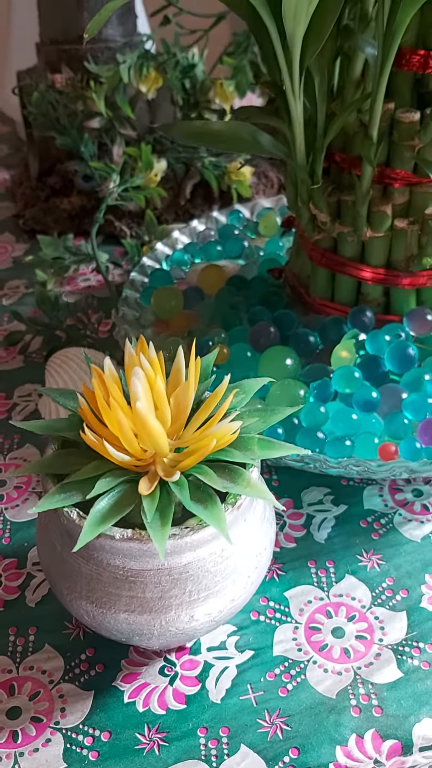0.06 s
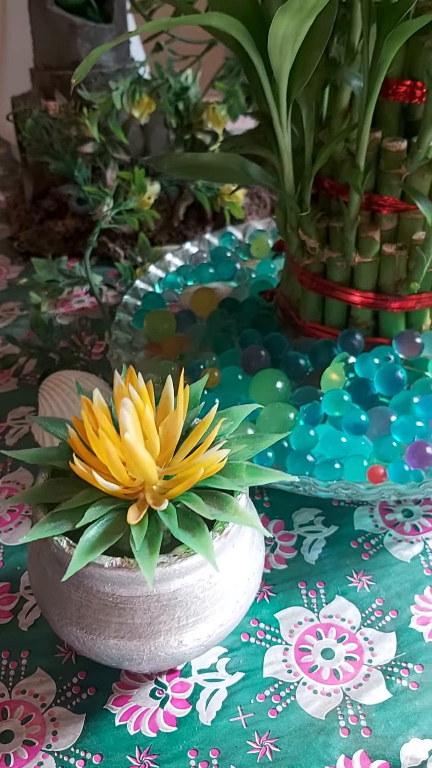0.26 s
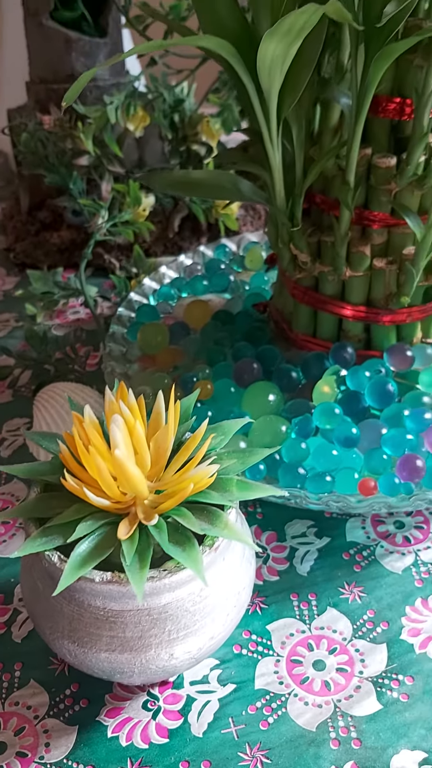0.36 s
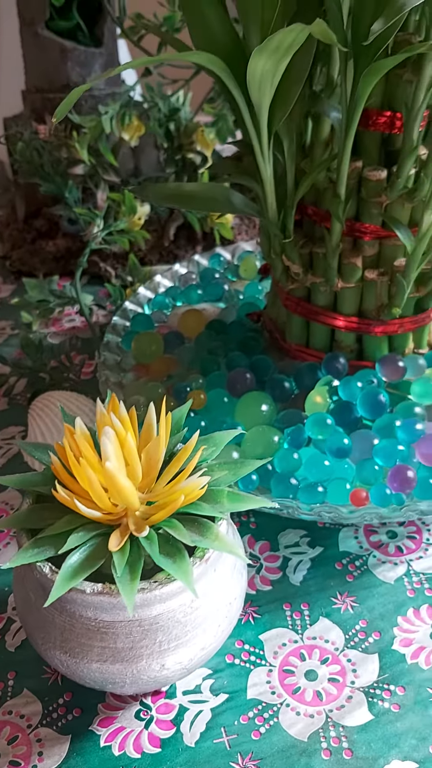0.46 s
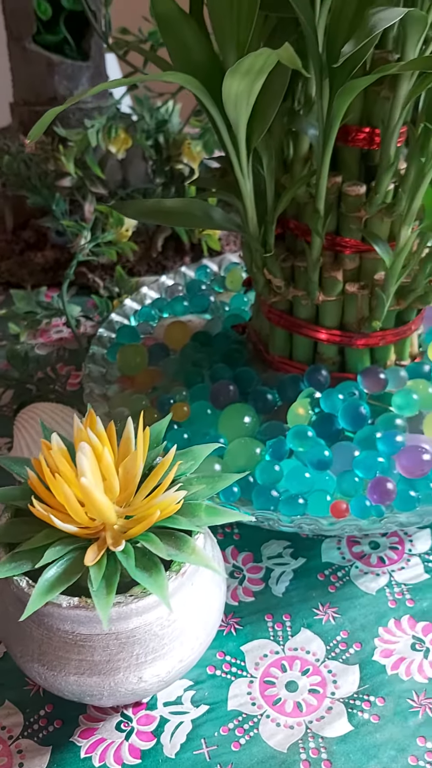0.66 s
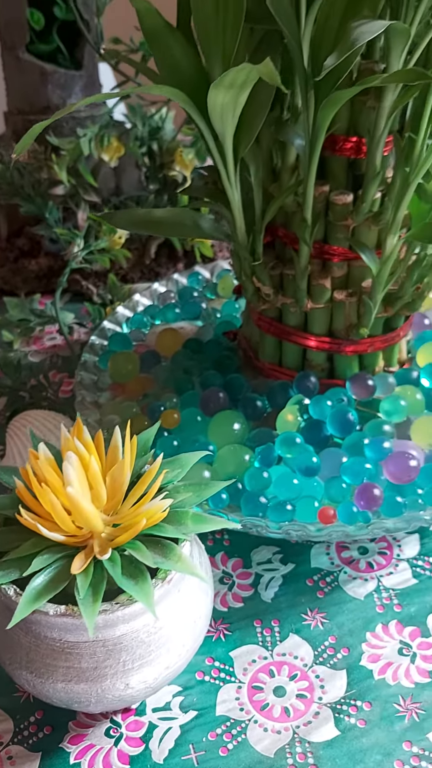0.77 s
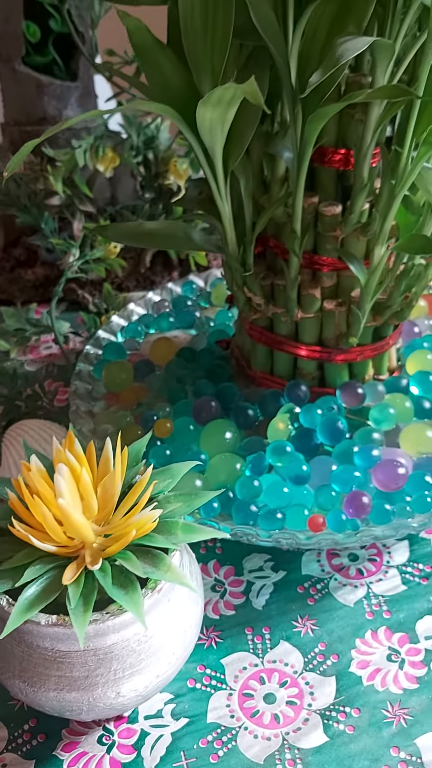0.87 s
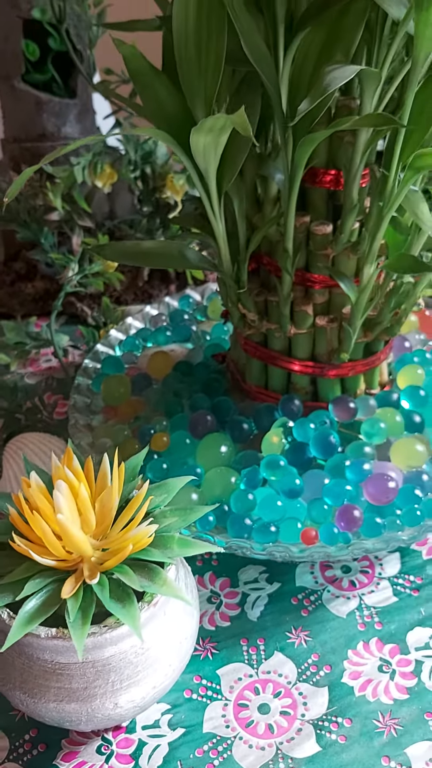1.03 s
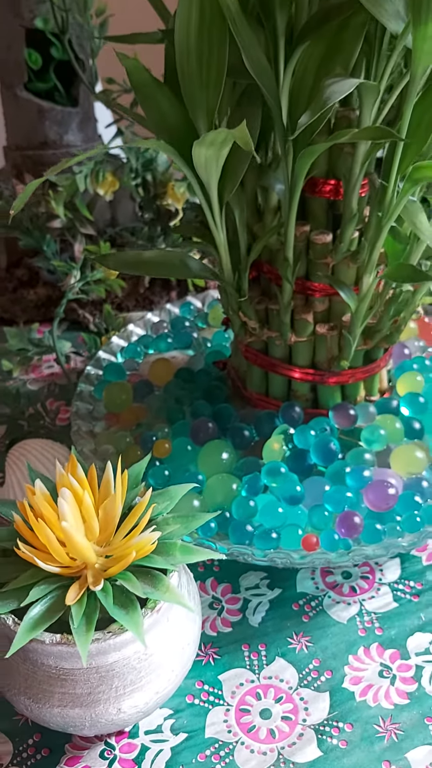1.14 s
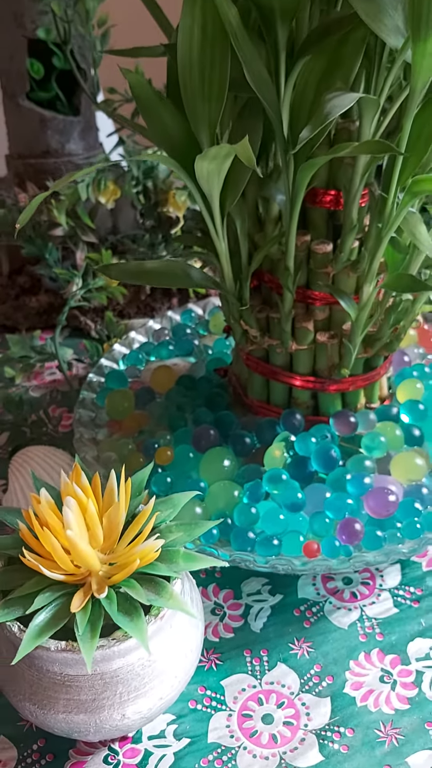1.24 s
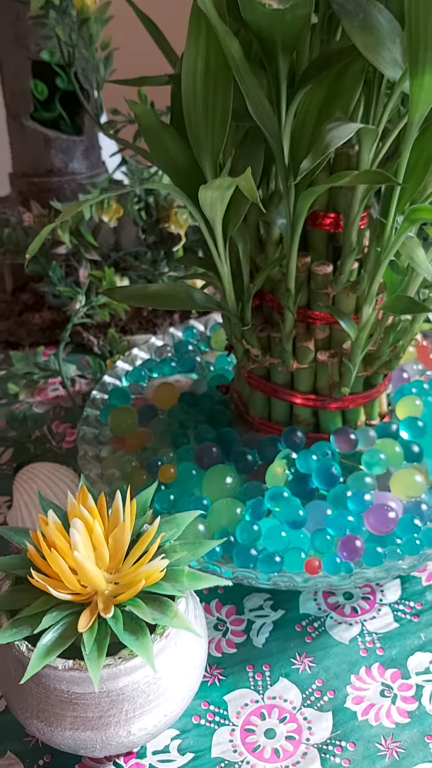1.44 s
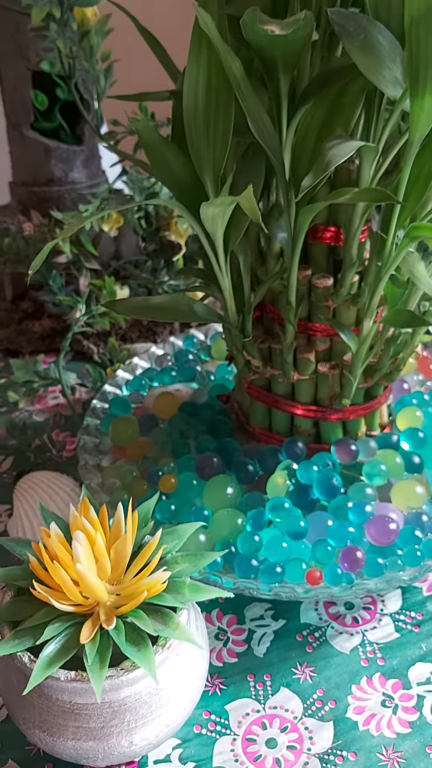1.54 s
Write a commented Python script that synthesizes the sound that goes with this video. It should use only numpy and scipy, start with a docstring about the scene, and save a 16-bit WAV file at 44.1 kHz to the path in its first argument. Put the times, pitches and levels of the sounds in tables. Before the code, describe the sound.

A small bird gives a quick double chirp at about 0.2 seconds and another at about 1.1 seconds. Each pair is a high, upward-leaping note followed by a slightly lower, louder one, ringing briefly in a hard-walled room. Underneath lie quiet room noise and faint microphone handling rumble, with soft shuffling around 0.3 and 1 second and a brief low hum under the first call.

```python
"""Two double chirps ring out from a small bird in a hard-walled room, heard at a hand-held microphone.
Each note is one whistle that starts at 3 to 4 kHz, leaps about an octave in a few milliseconds
and levels off; the walls smear it into two ringing bands. Underneath lie quiet room noise,
handling rumble at the microphone, soft shuffling and a brief low hum. Faintest are the fading ring
of an earlier chirp, then a far bird and a distant tone."""
import sys
import numpy as np
from scipy import signal
from scipy.fft import rfft, irfft
from scipy.io import wavfile
from scipy.ndimage import uniform_filter1d

SR = 44100
rng = np.random.default_rng(int(sys.argv[2]) if len(sys.argv) > 2 else 0)


def wav_out(sig):
    """Save sig, one row per channel (or a flat mono array), as 16-bit PCM at SR to the path in sys.argv[1]."""
    wavfile.write(sys.argv[1], SR, np.round(np.clip(np.atleast_2d(sig).T, -1, 1) * 32767).astype(np.int16))


N = 70560

# moments within one note (time [s])
NOTE_MOMENTS = [0, .004, .0063, .0104, .0118, .014, .018, .0215, .0265, .031]
# a call's high first note and lower second note at those moments (pitch [Hz], relative level [dB])
HIGH_NOTE = [(3900, -18.5), (4020, -7), (4070, 1), (4555, 1.5), (5190, -18.5), (7300, -14.5), (9000, -7.5),
             (9536, -2.5), (10000, 3.5), (9650, -11)]
LOW_NOTE = [(3135, -21), (3404, -12), (3723, 2.5), (4140, 3.5), (4906, -16.5), (7500, -4.5), (8300, -5),
            (8694, 0.5), (8733, 5), (8650, -19.5)]
# the notes sung (start [s], kind, pitch before the leap [ratio], pitch after it [ratio], gain [dB])
SONG = [(0.1957, "first", 1.003, 0.97, -33.5), (0.3306, "second", 1.015, 1.011, -31.5),
        (1.1297, "first", .996, .995, -34.5), (1.2284, "second", .985, .981, -31.5)]
# colour of the broad rasping hiss heard in each note (frequency [Hz], relative level [dB])
RASP_COLOUR = [(1500, -52), (2200, -31.5), (2450, -11), (2800, 2.5), (3150, -5), (3500, 4.5), (4600, -1),
               (5300, 2.5), (7500, 1), (9900, 2.5), (10700, -18.5), (12000, 0.5), (15500, -1.5)]
# the bird's balance at the microphone (frequency [Hz], left minus right [dB])
BIRD_BALANCE = [(2400, -.5), (4300, 1.5), (8500, -3), (10000, -9), (14000, 2.5)]
# ring of the hard walls (frequency [Hz], time to fall 60 dB [s])
ROOM_DECAY = [(2500, .42), (4000, 0.38), (6500, 0.39), (9000, 0.3), (15000, 0.23)]
# start of the room's longer tail (frequency [Hz], level against the main ring [dB])
LATE_TAIL = [(2500, -26.5), (4000, -24), (6000, -33.5), (9000, -42.5)]
# handling rumble and shuffling: colours (frequency [Hz], relative level [dB])
RUMBLE_COLOUR = [(20, -27.5), (38, -14.5), (56, 3.5), (85, 2), (135, 2), (170, -27.5), (400, -35.5),
                 (1500, -69)]
SHUFFLE_COLOUR = [(60, -28), (165, -6), (200, 3), (228, -10), (260, -1), (315, 2), (480, -10.5), (620, -11),
                  (800, -10.5), (1200, -17.5), (1700, -23.5), (2500, -36), (6000, -67.5)]
# their swells (time [s], level [dB])
RUMBLE_SWELLS = [(0, -54.5), (.16, -62), (.32, -49.5), (.48, -58), (.65, -66.5), (1.0, -61.5), (1.16, -63),
                 (1.33, -67), (1.42, -79)]
SHUFFLE_SWELLS = [(0, -57.5), (.1, -79.5), (0.252, -57.5), (.38, -54), (0.599, -68.5), (.86, -71),
                  (.945, -52), (1.015, -52.5), (1.07, -57.5), (1.169, -59), (1.401, -72.5)]
# colour of the room noise (frequency [Hz], relative level [dB])
ROOM_TONE_COLOUR = [(20, -17), (45, -5), (60, -8.5), (100, 0), (170, -7), (310, -2), (550, -8), (900, -6.5),
                    (1300, -17), (2100, -26), (3000, -29), (4000, -27.5), (5500, -40.5), (15500, -33.5)]
# slow drift of its low part (time [s], gain [dB])
ROOM_TONE_DRIFT = [(0, -63), (0.748, -62), (1.248, -61.5), (1.552, -67)]
# likeness of the noises in the two channels (frequency [Hz], correlation [-1 to 1])
NOISE_LIKENESS = [(50, .93), (130, .94), (300, 0.74), (600, 0.1), (1200, -0.2), (4000, 0.16), (15000, 0)]
# their balance at the microphone (frequency [Hz], left minus right [dB])
NOISE_BALANCE = [(40, -9), (110, 0.5), (300, -3.5), (700, -1.1), (15000, -1.5)]
# the fading ring of an earlier chirp, a far bird and a distant tone
# (middle [s], half length [s], pitch [Hz], width [Hz], level [dB])
FAINT_TONES = [(.01, 0.066, 4180, 237.6, -80), (0.74, 0.047, 2908, 117.7, -77.5),
               (1.559, 0.049, 943, 38.65, -71.5)]


def bird():
    """The bird in the room: two calls, each a high note and then a lower, louder one."""
    out = np.zeros(N)
    for start, kind, low_ratio, top_ratio, gain_db in SONG:
        contour = HIGH_NOTE if kind == "first" else LOW_NOTE
        add(out, start, amp(gain_db) * whistle(contour, low_ratio, top_ratio))
    return out


def whistle(contour, low_ratio, top_ratio, leap_s=.012, octave_db=-16, rasp_db=-13.5):
    """One leaping note with a weak octave; at the break it flutters and a rasping hiss is heard."""
    rasp_from_s, rasp_rise_s, rasp_fall_s = .0037, .006, .013
    hz, db = np.transpose(contour)
    t = np.arange(0, NOTE_MOMENTS[-1], 1 / SR)
    jitter, flutter, air = rng.standard_normal((3, 4096))[:, :len(t)]
    pitch = np.where(t < leap_s, low_ratio, top_ratio) * np.interp(t, NOTE_MOMENTS, hz)
    pitch *= 1 + .009 * wobble(jitter, rate_hz=1200)
    phase = 2 * np.pi * np.cumsum(pitch) / SR
    tone = np.sin(phase) + amp(octave_db) * np.sin(2 * phase)
    tone *= amp(np.interp(t, NOTE_MOMENTS, db))
    since = t - rasp_from_s
    rough = np.clip(since / rasp_rise_s, 0, 1)
    rough *= np.exp(-(np.maximum(since - rasp_rise_s, 0) / rasp_fall_s) ** 2)
    tone *= 1 + .16 * rough * wobble(flutter, rate_hz=618)
    rasp = amp(rasp_db) * unit(colour(air, RASP_COLOUR)) * rough
    fades = np.clip(np.minimum(t, t[-1] - t) / .002, 0, 1)  # 2 ms at each end
    return fades * (tone + rasp)


def reflections(direct, late_stretch=2.24, build_s=.005, likeness=.058):
    """The hard walls return dense echoes that die band by band, with a faint longer tail."""
    a, b = rng.standard_normal((2, SR))
    hz, t, bands = signal.stft(stereo(a, b, likeness), SR, nperseg=256)
    fall_db = -60 * t / read(ROOM_DECAY, hz)[:, None]
    late_db = read(LATE_TAIL, hz)[:, None] + fall_db / late_stretch
    bands *= np.hypot(amp(fall_db), amp(late_db))
    tail = signal.istft(bands, SR, nperseg=256)[1][:, :SR]
    tail *= np.minimum(np.arange(SR) / SR / build_s, 1)
    return signal.fftconvolve(direct[None], tail / np.linalg.norm(tail[0]), axes=1)[:, :N]


def hum(hz=58.6, start_s=.207, length_s=.198, rise_s=.055, fall_s=.045):
    """A low tone and its stronger octave swell and stop under the first call."""
    t = np.arange(N) / SR - start_s
    swell = np.clip(np.minimum(t / rise_s, (length_s - t) / fall_s), 0, 1)
    phase = 2 * np.pi * hz * t
    return np.sqrt(2) * swell * (amp(-52.5) * np.sin(phase) + amp(-46.5) * np.sin(2 * phase))


def handling():
    """Right at the microphone, the hand that holds it makes an uneven rumble."""
    return diffuse(RUMBLE_COLOUR) * amp(curve(RUMBLE_SWELLS))


def shuffling():
    """Soft shuffling in the room: dull noise that comes and goes."""
    return diffuse(SHUFFLE_COLOUR) * amp(curve(SHUFFLE_SWELLS))


def room_tone(split_hz=900, treble_follows=.38):
    """Quiet noise all around the microphone: the low part drifts in level, the hiss less so."""
    noise = diffuse(ROOM_TONE_COLOUR)
    low = signal.sosfiltfilt(signal.butter(2, split_hz, fs=SR, output="sos"), noise)
    low_db = curve(ROOM_TONE_DRIFT)
    hiss_db = low_db.mean() + treble_follows * (low_db - low_db.mean())
    return low * amp(low_db) + (noise - low) * amp(hiss_db)


def faint_tones():
    """An earlier chirp's fading ring, a far bird and a distant tone, each a narrow band of noise."""
    t, f = np.arange(N) / SR, np.fft.rfftfreq(N, 1 / SR)
    out = np.zeros((2, N))
    for middle, half, hz, width, db in FAINT_TONES:
        peak = np.exp(-.5 * ((f - hz) / width) ** 2)
        band = irfft(rfft(rng.standard_normal((2, N))) * peak, N)
        swell = np.exp(-.5 * ((t - middle) / half) ** 4)
        out += amp(db) * unit(band) * swell
    return out


def diffuse(points):
    """Coloured noise as it reaches the stereo microphone, nearly mono in the bass."""
    a, b = rfft(rng.standard_normal((2, N)))
    likeness = read(NOISE_LIKENESS, np.fft.rfftfreq(N, 1 / SR))
    pair = irfft(stereo(a, b, likeness), N)
    return unit(place(colour(pair, points), NOISE_BALANCE))


def stereo(a, b, likeness):
    """Blends two independent noises into a pair with the given correlation."""
    return np.array([a, likeness * a + np.sqrt(1 - likeness ** 2) * b])


def place(pair, balance):
    """Tilts a stereo pair left or right, band by band."""
    lean_db = read(balance, np.fft.rfftfreq(N, 1 / SR)) / 2
    return irfft(rfft(pair) * amp([lean_db, -lean_db]), N)


def colour(x, points):
    """Filters by a table of dB over frequency."""
    size = x.shape[-1]
    return irfft(rfft(x) * amp(read(points, np.fft.rfftfreq(size, 1 / SR))), size)


def wobble(noise, rate_hz):
    """Smooths noise into a tremble lying mostly below rate_hz."""
    return unit(uniform_filter1d(noise, int(SR / rate_hz)))


def read(points, hz):
    """Reads a table on a log-frequency axis."""
    f, value = np.transpose(points)
    return np.interp(np.log(hz + 1), np.log(f + 1), value)


def curve(points):
    """Reads a table over time, at every sample."""
    return np.interp(np.arange(N) / SR, *np.transpose(points))


def add(mix, start_s, sound):
    """Mixes a sound in at start_s."""
    part = mix[round(start_s * SR):][:len(sound)]
    part += sound[:len(part)]


def amp(db):
    """Decibels to gain."""
    return 10 ** (np.asarray(db) / 20)


def unit(x):
    """Scales to an rms of 1."""
    return x / np.sqrt(np.mean(x ** 2) + 1e-20)


def scene(reflections_db=8):
    """At the microphone: the bird, more echo than direct sound, over the room's low noises."""
    direct = bird()
    chirps = place(direct + amp(reflections_db) * reflections(direct), BIRD_BALANCE)
    return chirps + room_tone() + hum() + handling() + shuffling() + faint_tones()


def record(dry, edge_hz=15850):
    """The recorder's band limit cuts the highest treble."""
    lowpass = signal.firwin(511, edge_hz, window=("kaiser", 9), fs=SR)
    return signal.oaconvolve(dry, lowpass[None], "same")


dry = scene()
out = record(dry)
wav_out(out)
```